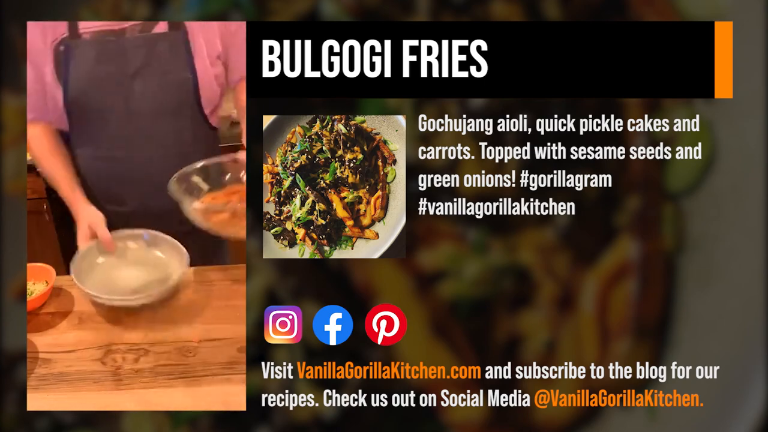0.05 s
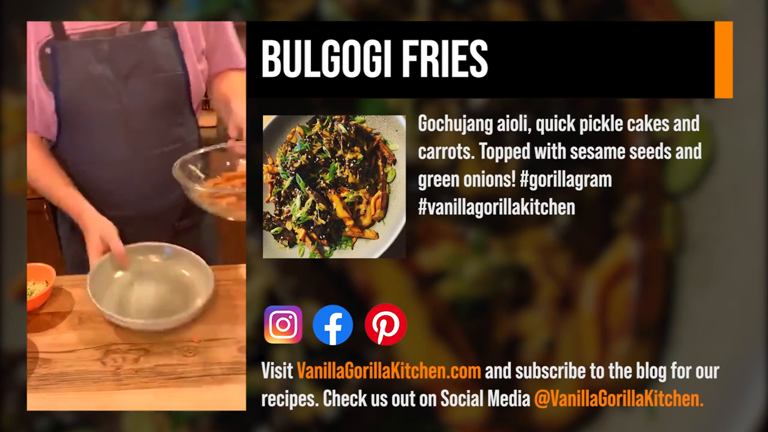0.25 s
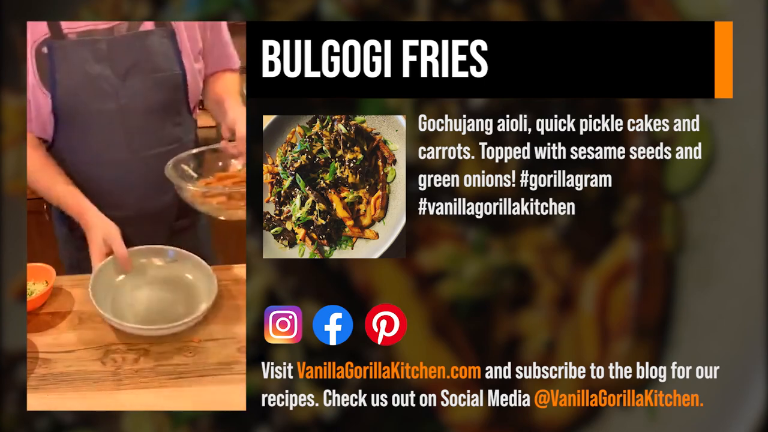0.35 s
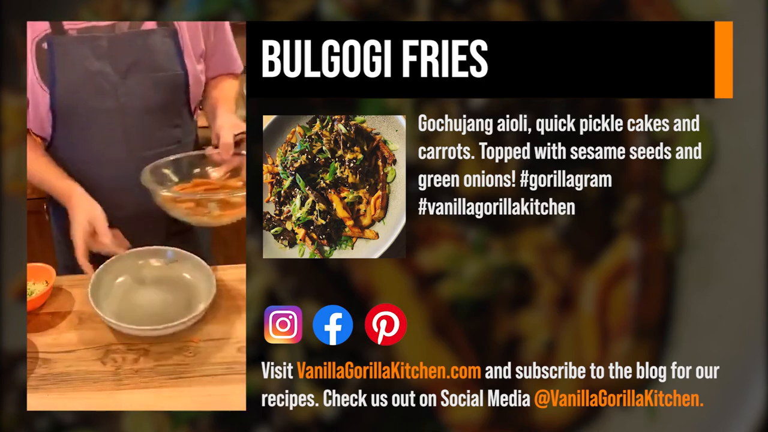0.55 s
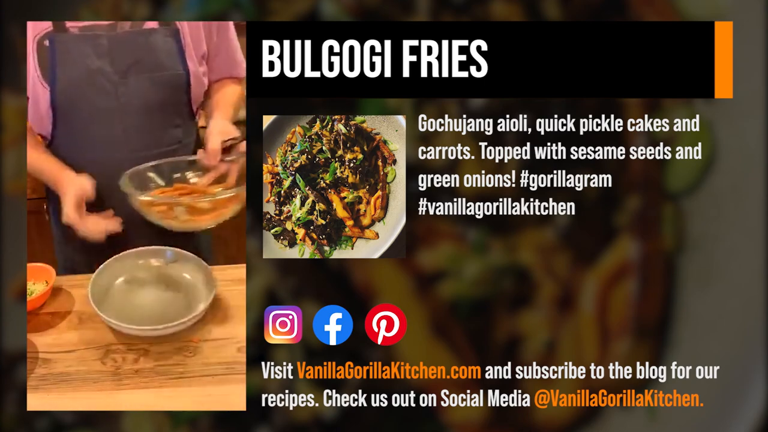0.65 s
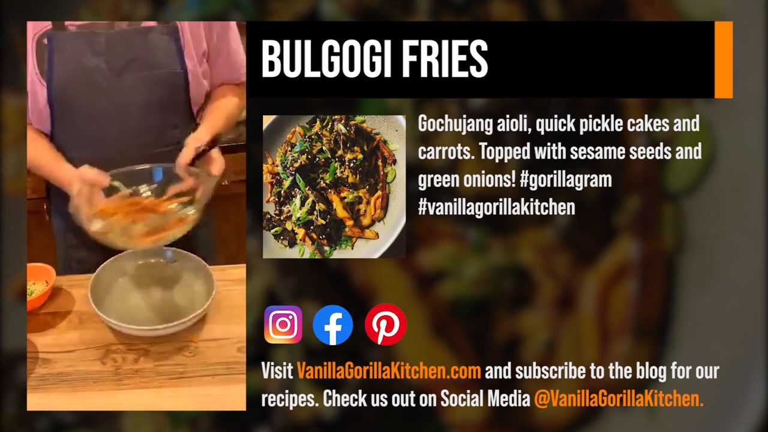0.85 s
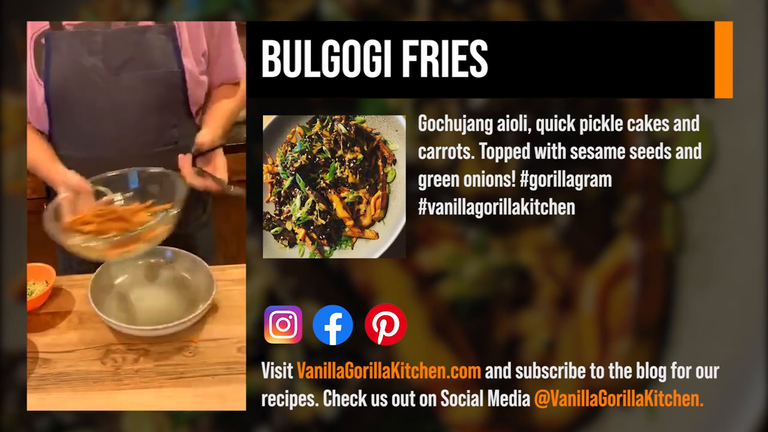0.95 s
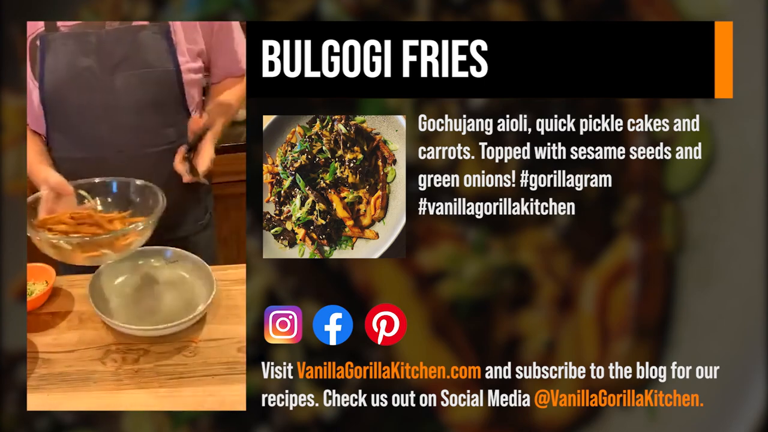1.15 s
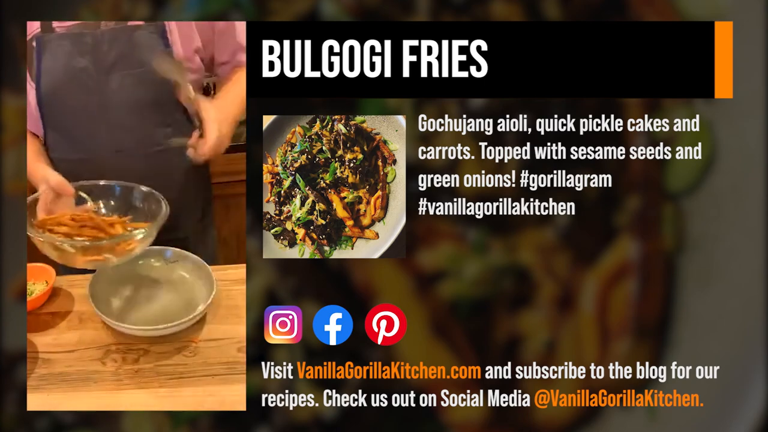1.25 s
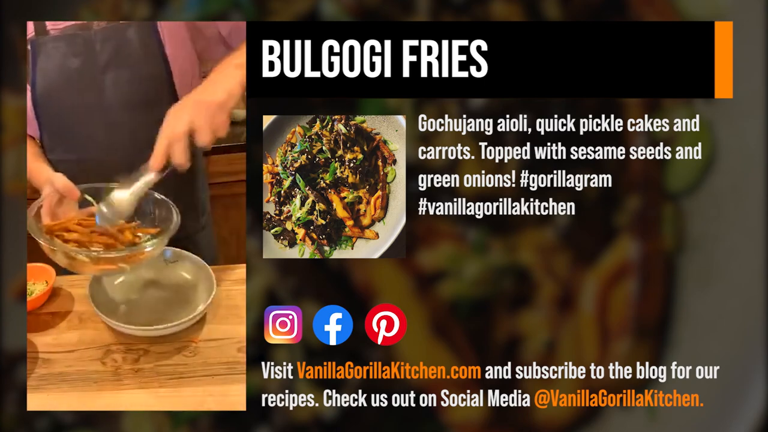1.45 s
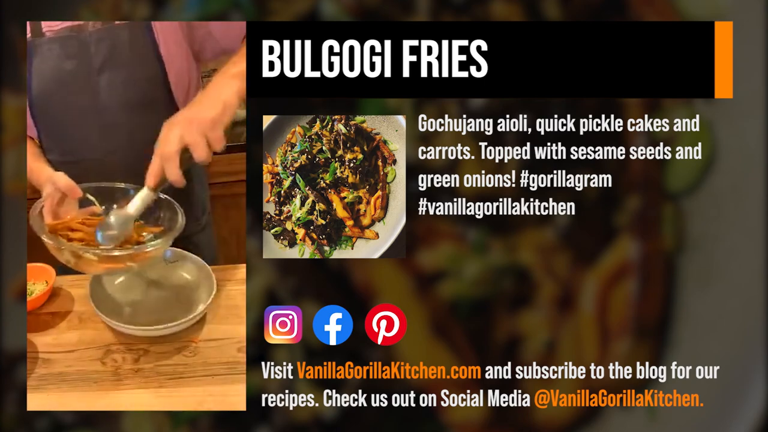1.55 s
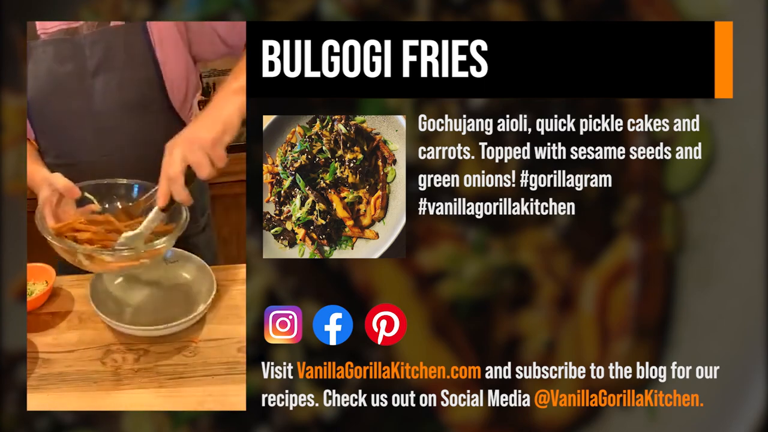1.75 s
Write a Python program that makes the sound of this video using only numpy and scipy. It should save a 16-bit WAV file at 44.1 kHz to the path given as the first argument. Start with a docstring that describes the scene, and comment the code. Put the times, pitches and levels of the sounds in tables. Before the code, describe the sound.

Steel tongs clink on a glass bowl in a small, faintly humming kitchen. First a serving bowl slides over wood, knocking at 0.2 seconds and again, ringing, at 0.5. The tongs scrape and clink on the glass rim around 0.8, then spring open with a rattle near 1.2. They strike the glass sharply at 1.5, moist vegetables rustle softly, and a light clink follows near 1.75.

```python
"""A serving bowl slides over a wooden board, knocks down twice and rings as it rocks free.
Steel tongs scrape along the rim of a glass bowl, clink on it and spring open with a rattle.
They strike the inner wall, then dig into moist vegetables that rustle and shift in the
bowl's hollow, and a last light clink rings out. Throughout, a small kitchen hums faintly
and answers each blow."""
import sys
import numpy as np
from scipy import signal
from scipy.fft import rfft, irfft
from scipy.io import wavfile

SR = 44100
rng = np.random.default_rng(int(sys.argv[2]) if len(sys.argv) > 2 else 0)


def unload_wav(signal):
    """Save mono or channel-first audio to the path in sys.argv[1] as 16-bit WAV at rate SR, clipped to [-1, 1]."""
    wavfile.write(
        sys.argv[1],
        SR,
        np.round(np.clip(np.atleast_2d(signal).T, -1, 1) * 32767).astype(np.int16),
    )


N = 79380

# glass bowl modes, tongs against it: (frequency [Hz], rim level [dB], inner wall level [dB], t60 [s])
GLASS_MODES = [(1497, -46, -50, .75), (2677, -38, -28, .21), (3580, -48, -39, .1), (4126, -42, -42, .1),
               (4226, -50, -37, .15), (4886, -40, -41, .24), (5550, -43, -37, .2), (5821, -36, -40, .2),
               (6070, -46, -33.5, .15), (7735, -41, -45, .12), (8411, -54, -33, .18), (9290, -45, -42, .21),
               (12560, -43, -48, .15), (14063, -58, -31, .1), (15555, -62, -37, .09)]


def amp(db):
    """Decibels to gain."""
    return 10 ** (np.asarray(db) / 20)


def unit(x):
    """Scales to an rms of one."""
    return x / np.sqrt(np.mean(x ** 2) + 1e-20)


def read(points, hz):
    """Reads a curve along a log-frequency axis."""
    f, value = np.transpose(points)
    return np.interp(np.log(hz + 1), np.log(f + 1), value)


def add(mix, s, sound):
    """Mixes a sound in at s seconds."""
    part = mix[round(s * SR):][:len(sound)]
    part += sound[:len(part)]


def colour(x, spectrum, size=4096):
    """Minimum-phase EQ of unit energy: the spectrum sets the tone, not the level."""
    log_gain = np.log(amp(read(spectrum, abs(np.fft.fftfreq(size, 1 / SR)))))
    response = np.exp(np.conj(signal.hilbert(log_gain)))
    taps = np.fft.ifft(response).real[:size // 2]
    return signal.fftconvolve(x, taps / np.linalg.norm(taps))[:len(x)]


def ring(modes):
    """Decaying sines of a struck body."""
    t = np.arange(N) / SR
    return sum(amp(db - 60 * t / t60) * np.sin(2 * np.pi * hz * t) for hz, db, t60 in modes)


def ring_at(modes, place):
    """Rings modes whose strength depends on the place struck, from rim (0) to inner wall (1)."""
    return ring([(hz, (1 - place) * rim_db + place * wall_db, t60) for hz, rim_db, wall_db, t60 in modes])


def crack(spectrum, decay_s, attack_s=0.00044):
    """Hard contact: a dense, quickly dying burst, whitened and then coloured."""
    t = np.arange(N) / SR
    envelope = amp(-60 * t / decay_s) * (1 - np.exp(-t / attack_s))
    bins = rfft(rng.choice([-1., 1.], N) * envelope)
    burst = irfft(bins / (abs(bins) + 1e-9), N) * np.exp(-(t / decay_s) ** 2)
    return colour(burst / np.linalg.norm(burst), spectrum)


def rub(stroke, spectrum, grain_db, fade_db_per_s=300):
    """Friction noise that fades outside its stroke; more grain makes the tiny slips more uneven."""
    t = np.arange(N) / SR
    times, db = np.transpose(stroke)
    outside_s = np.maximum(times[0] - t, 0) + np.maximum(t - times[-1], 0)
    slips = rng.standard_normal(N) * amp(grain_db * np.minimum(rng.exponential(1, N), 7))
    return unit(colour(slips, spectrum)) * amp(np.interp(t, times, db) - fade_db_per_s * outside_s)


def room_tone():
    """Steady ventilation and appliance hum."""
    # ventilation rumble: (frequency [Hz], gain [dB])
    air_eq = [(15, -44), (36, -20), (60, -2), (130, 0), (200, -6.5), (290, -0.5), (450, -2.5), (700, -6),
              (1200, -11.5), (2500, -22), (5000, -32), (10000, -46), (16000, -58.5)]
    # appliance tones: (frequency [Hz], level [dB])
    hum_tones = [(60, -72), (271, -69)]
    t = np.arange(N) / SR
    hum = sum(amp(db) * unit(np.sin(2 * np.pi * (hz * t + rng.random()))) for hz, db in hum_tones)
    return hum + amp(-58.5) * unit(colour(rng.standard_normal(N), air_eq))


def kitchen_reverb(x, size=256):
    """Quick echoes off the counter and walls, then a diffuse tail that dies band by band."""
    # diffuse tail: (frequency [Hz], t60 [s], level [dB])
    bands = [(80, 0.34, 4), (249, 0.6, 6.5), (590, 0.23, -3), (1180, 0.48, -11), (2520, 0.37, -7.5),
             (4970, 0.48, -12), (8950, 0.4, -7), (16000, 0.28, -11)]
    # single echoes off nearby walls: (delay [s], level [dB])
    slaps = [(.0115, -23), (.0235, -17.5)]
    predelay_s, early_db, early_t60_s = .005, -14, 0.051
    hz, t, noise = signal.stft(rng.standard_normal(SR), SR, nperseg=size)
    t60 = read([(f, decay) for f, decay, _ in bands], hz)[:, None]
    late_db = read([(f, db) for f, _, db in bands], hz)[:, None]
    late_power = amp(late_db - 60 * t / t60) ** 2 / t60
    early_power = amp(early_db - 60 * t / early_t60_s) ** 2 / early_t60_s
    envelope = np.sqrt((early_power + late_power) * 2 * np.log(1000) / SR)
    tail = signal.istft(noise * envelope, SR, nperseg=size)[1]
    wet = np.zeros(N)
    add(wet, predelay_s, signal.fftconvolve(x, tail))
    for delay_s, db in slaps:
        add(wet, delay_s, amp(db) * x)
    return wet


def bowl_slide():
    """The serving bowl rubs over the wooden board in one soft swell."""
    # push across the board: (time [s], level [dB])
    stroke = [(0, -64), (0.08, -66), (0.15, -58.5), (0.22, -53), (0.29, -59), (0.35, -68), (0.42, -100)]
    # friction on wood: (frequency [Hz], gain [dB])
    wood_eq = [(200, -18), (900, 3.5), (2500, 2), (4000, -2), (7000, -2), (9500, -6), (13000, -11),
               (16000, -12.5)]
    return rub(stroke, wood_eq, grain_db=2.5)


def vegetables():
    """Moist vegetables rustle under the tongs, and the bowl's hollow sounds as they shift."""
    # tongs digging in: (time [s], level [dB])
    rustle = [(1.52, -51.5), (1.62, -75), (1.66, -51.5), (1.70, -61), (1.73, -55), (1.76, -48.5),
              (1.8, -46.5)]
    # wet rustle: (frequency [Hz], gain [dB])
    rustle_eq = [(300, -15), (1200, -1), (2000, -4.5), (3500, -4), (5500, -1), (8000, -7), (12000, -9.5),
                 (16000, -18)]
    # food shifting: (time [s], level [dB])
    shift = [(1.58, -76), (1.63, -77), (1.66, -51), (1.69, -62), (1.73, -53.5), (1.76, -39), (1.8, -57)]
    # hollow of the glass bowl: (frequency [Hz], gain [dB])
    hollow_eq = [(150, -32.5), (450, -5), (630, 10), (850, -2), (1300, -8), (2500, -43), (8000, -59)]
    return rub(rustle, rustle_eq, grain_db=3.5) + rub(shift, hollow_eq, grain_db=2.5)


def foot_grit():
    """The serving bowl's foot grinds faintly as it settles."""
    # settling: (time [s], level [dB])
    stroke = [(0.48, -71.5), (0.494, -50.5), (0.503, -68.5), (0.55, -85.5)]
    # fine, bright grit: (frequency [Hz], gain [dB])
    grit_eq = [(2000, -15), (5000, 6), (8800, -3), (10000, -5), (12000, -14), (16000, -17.5)]
    return rub(stroke, grit_eq, grain_db=0)


def bowl_knocks():
    """Each knock thuds in board and counter and cracks at the foot; the bowl rings up as it rocks free."""
    # bowl meets board: (time [s], thud [dB], thud cutoff [Hz], board pitch [ratio], crack [dB], ring [dB])
    knocks = [(0.2254, 1.5, 1960, 0.98, -32, -38), (0.2858, -13.5, 1480, 1, -43.5, -35.5),
              (0.4514, -6, 615, 0.89, -28, -22.5), (0.4555, -6, 419, .94, -33.5, -43.5),
              (0.4808, -5, 2540, 1, -1, -0.5), (0.4924, -13.5, 1503, 0.92, -10.5, -37.5),
              (0.4990, -15, 908, 0.97, -12.5, -20), (0.5128, -9.5, 1510, 0.98, -21.5, -18.5),
              (0.5205, -11, 1200, 0.98, -47, -28)]
    # wooden board: (frequency [Hz], level [dB], t60 [s])
    board_modes = [(66.7, -47.5, .3), (281, -32, 0.056), (524, -16, 0.036), (710, -20, 0.017),
                   (950, 0.5, 0.015), (1370, -15, 0.031), (1673, -25, 0.052), (2048, -21.5, 0.024)]
    # longer boom of the counter: (frequency [Hz], level [dB], t60 [s])
    counter_modes = [(400, -46, .28), (497, -41, .28), (534, -47, .26), (600, -42, .3), (698, -35, .3),
                     (767, -36, .28), (837, -37, .25), (881, -43, .22), (1070, -45, .2)]
    # ring of the serving bowl: (frequency [Hz], level [dB], t60 [s])
    bowl_modes = [(748, -29, .5), (910.5, -21, .28), (953, -17.5, .72), (1174, -35, .28), (1272, -28, .38),
                  (1360, -33, .42), (1445, -42, .3), (1696, -35, .36), (1964, -37, .26), (2083, -33, .72),
                  (3494, -55, .22), (3736, -55, .2), (4307, -46, .28), (5911, -58, .17), (6621, -61, .26),
                  (7068, -53, .14), (8064, -62, .17), (15560, -69, .18)]
    # crack of its hard foot: (frequency [Hz], gain [dB])
    foot_eq = [(60, -28), (300, -21), (660, -6), (1300, 0), (1780, -15.5), (2000, -12), (2650, -26.5),
               (3100, -33), (4450, -33.5), (7200, -61.5), (10000, -73), (16000, -86)]
    thud_rise_s, boom_rise_s, bowl_rise_s = .0016, .006, 0.043
    blows, rings = np.zeros((2, N))
    t = np.arange(N) / SR
    attack = np.minimum(t / thud_rise_s, 1) ** 2
    boom = ring(counter_modes) * np.minimum(t / boom_rise_s, 1)
    bowl = ring(bowl_modes) * np.minimum(t / bowl_rise_s, 1)
    for s, thud_db, cutoff_hz, pitch, crack_db, ring_db in knocks:
        lowpass = signal.butter(2, cutoff_hz, fs=SR)
        thud = ring([(hz * pitch, db, t60) for hz, db, t60 in board_modes]) * attack
        foot = amp(crack_db + 11.5) * crack(foot_eq, decay_s=0.0055)
        add(blows, s, amp(thud_db) * signal.lfilter(*lowpass, thud) + foot)
        add(rings, s, amp(thud_db) * signal.lfilter(*lowpass, boom) + amp(ring_db) * bowl)
    return np.array([blows + foot_grit(), rings])


def tip_ping():
    """One tong tip rings briefly on the last clink."""
    # steel tip: (frequency [Hz], level [dB], t60 [s])
    tip_modes = [(5195, -27, .05), (7490, -37, .045), (7775, -38, .05)]
    blows, rings = np.zeros((2, N))
    add(rings, 1.7563, ring(tip_modes))
    return np.array([blows, rings])


def rim_scrape():
    """Steel slips along the rim and sets the glass singing."""
    # drag before the first clink: (time [s], level [dB])
    stroke = [(0.785, -83), (0.802, -58.5), (0.818, -47), (0.828, -41), (0.846, -63), (0.852, -81)]
    # steel rubbing on glass: (frequency [Hz], gain [dB])
    scrape_eq = [(400, -37.5), (1200, -22), (1500, 6), (2100, -14), (2700, -3.5), (3200, -11), (4200, -2.5),
                 (5200, -14.5), (8000, -20), (8700, -32), (10000, -25), (16000, -42)]
    slips = rub(stroke, scrape_eq, grain_db=0)
    singing = amp(-1) * signal.fftconvolve(slips, ring_at(GLASS_MODES, place=0))[:N]
    return np.array([slips, singing])


def tongs_opening():
    """The lock lets go, the arms hit their stop and rattle; light taps are duller."""
    # lock and hinge hits: (time [s], level [dB])
    snaps = [(0.9947, -13), (1.185, -19), (1.189, -12.5), (1.1942, -1.5), (1.251, -18.5), (1.341, -25.5),
             (1.3837, -32)]
    # steel arms: (frequency [Hz], level [dB], t60 [s])
    arm_modes = [(3060, -46, .14), (3185, -38, .16), (4297, -40, .12), (4715, -39, .11), (4900, -45, .2),
                 (5075, -44, .15), (5500, -45, .14), (7045, -35, .1), (7860, -39, .08)]
    # crack of steel on steel: (frequency [Hz], gain [dB])
    snap_eq = [(300, -28), (900, -30), (1800, -14), (2300, -3.5), (3100, -1.5), (3500, -2.5), (4500, 4.5),
               (5700, 1.5), (6250, -7.5), (7050, 4.5), (7400, -5.5), (7850, 2.5), (8600, -8.5),
               (10200, -10.5), (11300, -3.5), (12500, -5), (13000, -7), (13700, -6), (16000, -15)]
    light_tap_db, light_tap_hz, hz_per_db = -30, 6140, 350
    blows, rings = np.zeros((2, N))
    arms = ring(arm_modes)
    for s, db in snaps:
        cutoff_hz = light_tap_hz + hz_per_db * (db - light_tap_db)
        lowpass = signal.butter(1, cutoff_hz, fs=SR)
        add(blows, s, amp(db - 1.5) * signal.lfilter(*lowpass, crack(snap_eq, decay_s=0.016)))
        add(rings, s, amp(db) * arms)
    return np.array([blows, rings])


def glass_clinks():
    """Steel strikes glass: a crack, a brief clang of the tips and the longer ring of the bowl."""
    # tong hits: (time [s], crack [dB], crack decay [s], clang [dB], ring [dB], place [0 rim, 1 wall])
    clinks = [(0.8477, 4, 0.037, -1, -1, 0), (0.9144, -11, 0.019, -18, -25, 0.67),
              (0.9285, -14.5, 0.02, -28, -46, 0.38), (1.486, 2, 0.013, 2, -4, 0.85),
              (1.7564, -11.5, 0.025, -26, -26, 0)]
    # steel tips on glass: (frequency [Hz], rim level [dB], inner wall level [dB], t60 [s])
    clang_modes = [(960, -31.5, -26.5, 0.017), (1765, -25, -38, 0.016), (2579, -17, -31, 0.024),
                   (3650, -20, -30, .022), (4105, -22.5, -13.5, 0.017), (4800, -24, -29, 0.033),
                   (5700, -34, -20, 0.018), (6100, -30, -11.5, 0.021), (6700, -28, -28.5, .02),
                   (7830, -16.5, -22, 0.023), (8440, -48, -11.5, 0.015), (9230, -25.5, -24.5, 0.026),
                   (12500, -32, -20, .009)]
    # broad crack under the clang: (frequency [Hz], gain [dB])
    crack_eq = [(150, -43.5), (300, -31), (550, -7.5), (1200, -10), (3000, -4.5), (6500, 0), (8600, -14),
                (10000, -7.5), (10900, -4.5), (13000, -9), (16000, -14)]
    clang_rise_s = 0.00021
    blows, rings = np.zeros((2, N))
    attack = 1 - np.exp(-(np.arange(N) / SR / clang_rise_s) ** 2)
    for s, crack_db, decay_s, clang_db, ring_db, place in clinks:
        clang = amp(clang_db) * attack * ring_at(clang_modes, place)
        add(blows, s, amp(crack_db) * crack(crack_eq, decay_s) + clang)
        add(rings, s, amp(ring_db) * ring_at(GLASS_MODES, place))
    return np.array([blows, rings])


def scene():
    """Blows feed the reverb fully and ringing more softly; the slide and the vegetables stay dry."""
    blows, rings = bowl_knocks() + rim_scrape() + glass_clinks() + tongs_opening() + tip_ping()
    rubbing = bowl_slide() + vegetables()
    reverb = kitchen_reverb(blows + amp(-7.5) * rings)
    return (blows + rings + rubbing + reverb + room_tone())[None]


def record(dry):
    """A steep low-pass trims the very top of the treble."""
    lowpass = signal.firwin(255, cutoff=16100, window=("kaiser", 9), fs=SR)
    return signal.oaconvolve(dry, lowpass[None], "same")


dry = scene()
out = record(dry)
unload_wav(out)
```